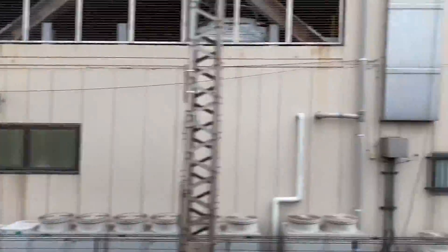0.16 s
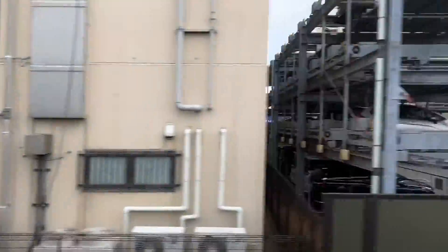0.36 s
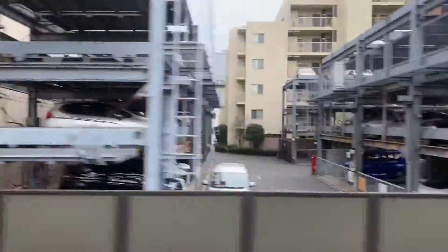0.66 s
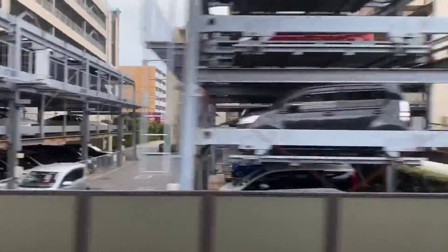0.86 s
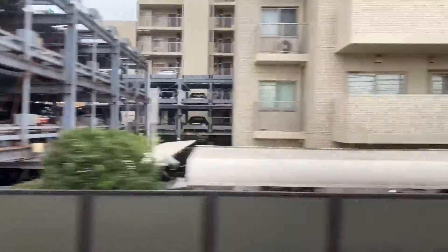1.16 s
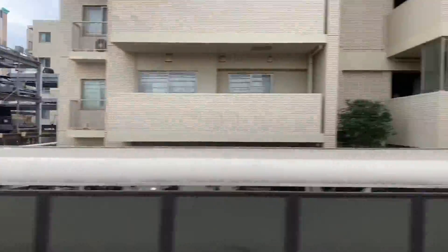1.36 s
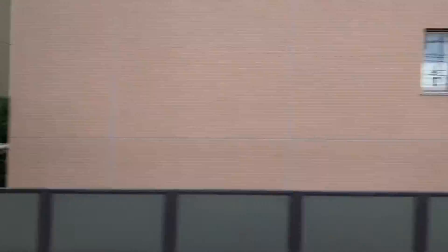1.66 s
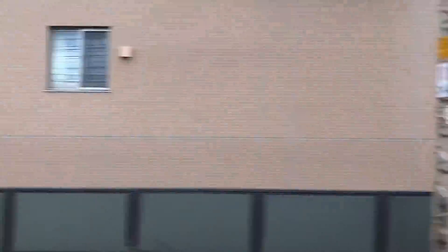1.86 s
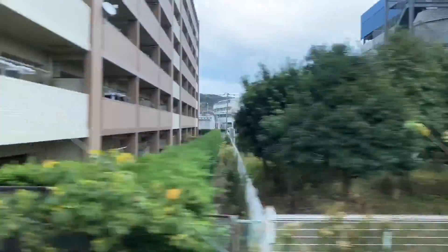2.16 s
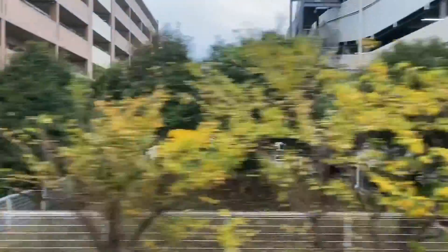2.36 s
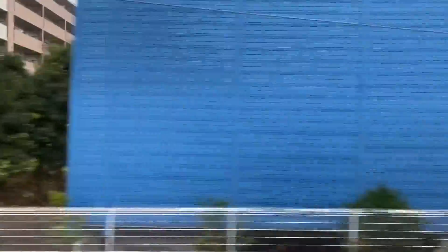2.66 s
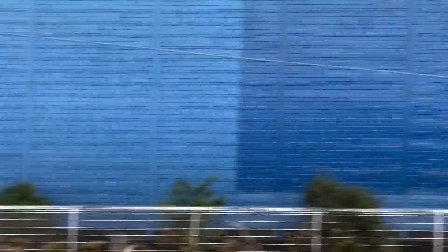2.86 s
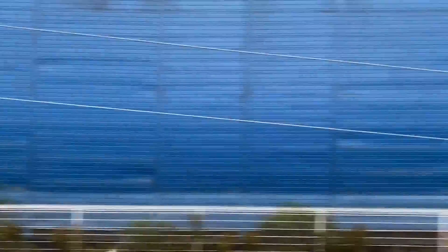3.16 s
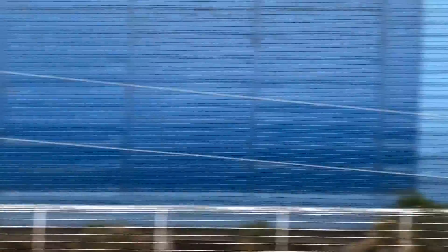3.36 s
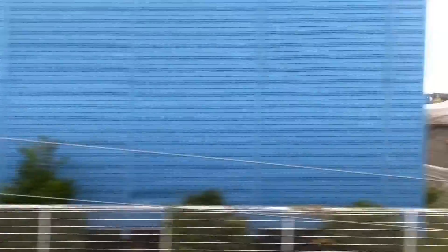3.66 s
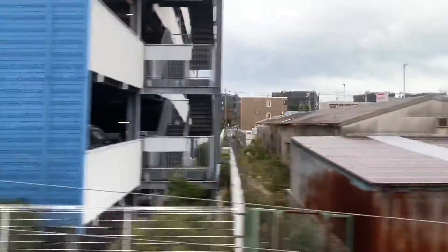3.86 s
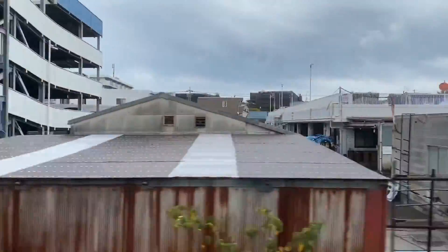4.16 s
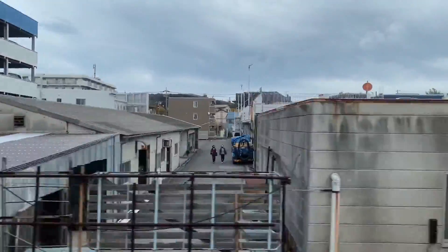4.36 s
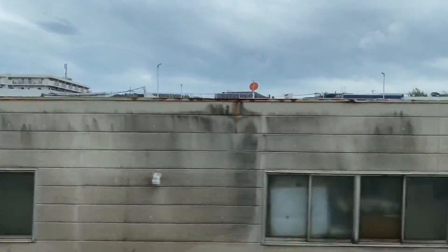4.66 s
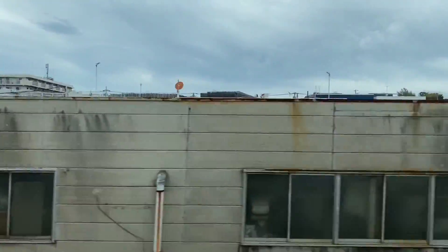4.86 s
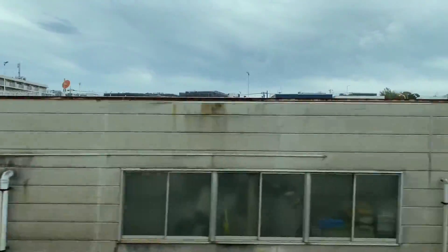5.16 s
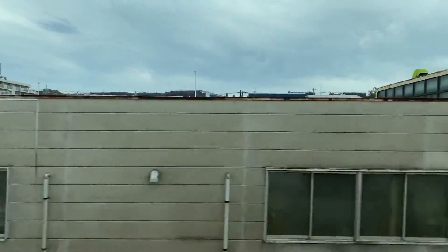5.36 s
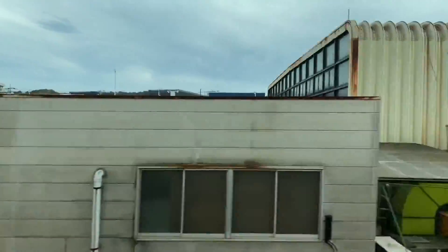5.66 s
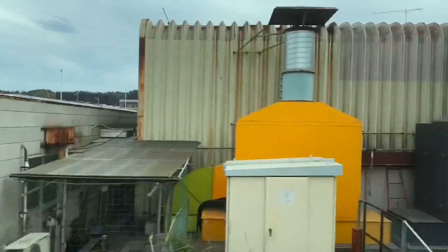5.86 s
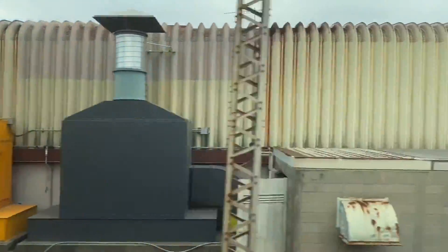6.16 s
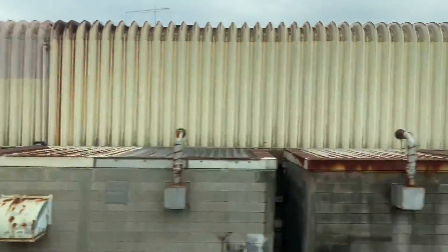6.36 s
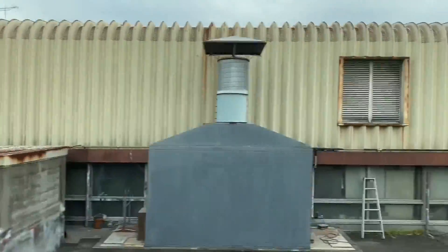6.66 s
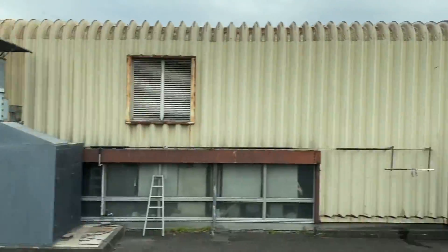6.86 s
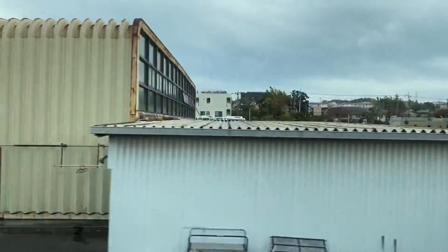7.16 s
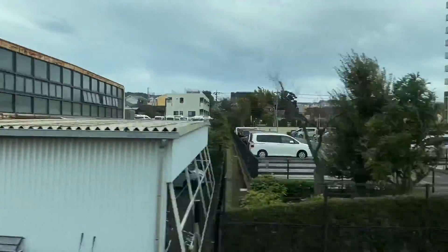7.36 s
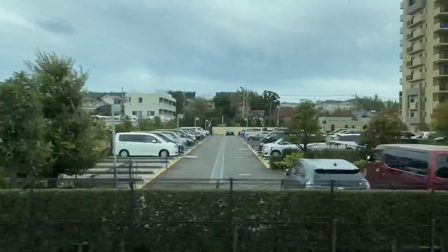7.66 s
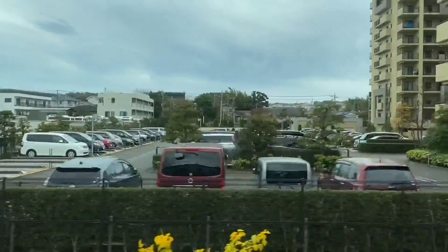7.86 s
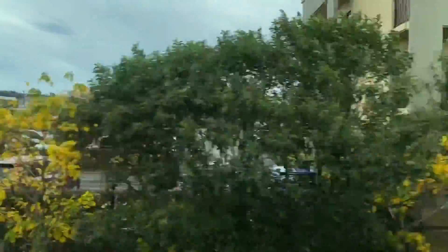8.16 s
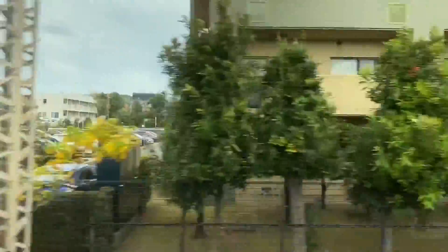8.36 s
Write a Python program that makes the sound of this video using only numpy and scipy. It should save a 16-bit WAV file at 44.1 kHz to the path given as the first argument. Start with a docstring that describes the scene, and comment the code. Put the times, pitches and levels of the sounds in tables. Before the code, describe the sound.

Stereo microphone in an enclosed train car beside the window. Dull rolling noise and a low electric hum run throughout, calmer at first, rougher from about three seconds, roughest near seven, then easing. Short thuds shake the floor and loose fittings knock and rattle. Rails sing faintly, flanges scuff, two tiny air hisses hide in the rumble, and a soft metallic wheel ring comes after a rattling cluster.

```python
"""Rolling wheels shake an electric commuter train's car body: band-filtered noise that follows track roughness.
The train coasts on welded rail, slowing slightly; motor tones and gear whine sink with it, rails sing faintly.
Bumps ring the floor modes, rail pits and flange scuffs are shaped noise, a wheel twice rings in a narrow band.
Loose fittings knock as clicks and decaying noise; air hisses twice, and one tiny tick is a filtered impulse."""
import sys
import numpy as np
from scipy import signal
from scipy.fft import rfft, irfft
from scipy.io import wavfile
from scipy.ndimage import uniform_filter1d, minimum_filter1d

SR = 44100
rng = np.random.default_rng(int(sys.argv[2]) if len(sys.argv) > 2 else 0)


def transcribe(u):
    """Save the signal u as a 16-bit wav file named by the first command-line argument.

    u: samples, shape (n,) or (channels, n), limited to [-1, 1]; the rate is SR.
    q: integer samples, one column per channel.
    """
    v = np.clip(np.atleast_2d(u).T, -1, 1)
    q = np.round(v * 32767).astype(np.int16)
    wavfile.write(sys.argv[1], SR, q)


N = 374850
T = np.arange(N) / SR
HZ = np.maximum(np.fft.rfftfreq(N, 1 / SR), 1)
LEFT_RIGHT = np.array([[1], [-1]])


def from_db(db):
    """Decibels to amplitude gain."""
    return 10 ** (np.asarray(db) / 20)


def in_time(rows):
    """Each column of a curve, interpolated at every sample."""
    s, *columns = np.transpose(rows)
    return [np.interp(T, s, c) for c in columns]


def over_hz(points):
    """Each column of a spectrum table, interpolated over log frequency."""
    hz, *columns = np.transpose(points)
    return np.squeeze([np.interp(np.log(HZ), np.log(hz), c) for c in columns])


def drift(rate_hz):
    """Slow random motion of spread 1: twice low-passed noise."""
    step = 100  # samples between drawn points
    warm_up = 1000
    r = np.exp(-2 * np.pi * rate_hz * step / SR)
    noise = rng.standard_normal(N // step + 2 + warm_up)
    slow = signal.lfilter([1], [1, -2 * r, r * r], noise)[warm_up:]
    return np.interp(np.arange(N) / step, np.arange(len(slow)), slow / slow.std())


def flutter(rate_hz, depth_db):
    """Random swelling and sinking of a level."""
    return from_db(depth_db * drift(rate_hz))


def pan(side_db):
    """Left and right gains for a level difference."""
    return from_db(0.5 * LEFT_RIGHT * side_db)


def band(low_hz, high_hz):
    """Gain of a steep band-pass."""
    return 1 / np.sqrt((1 + (low_hz / HZ) ** 10) * (1 + (HZ / high_hz) ** 10))


def coloured(field, gain):
    """Stereo noise of a given colour, rms 1 in the middle."""
    x = irfft(field * gain, N)
    return x / x.mean(0).std()


def dying(blows, decay_s):
    """Each blow lifts a level that then dies away exponentially."""
    return signal.lfilter([1], [1, -np.exp(-1 / (decay_s * SR))], blows)


def burst(s, rise_s, decay_s):
    """Envelope that rises linearly from time s and dies away exponentially."""
    age = np.maximum(T - s, 0)
    return np.minimum(age / rise_s, 1) * np.exp(-np.maximum(age - rise_s, 0) / decay_s)


def swells(rows):
    """Joint envelope of a table of brief swelling sounds."""
    return sum(from_db(db) * burst(s, rise_s, decay_s) for s, db, rise_s, decay_s in rows)


# cabin at the two ears: (frequency [Hz], likeness [0-1], left lead [rad], left-right [dB])
EAR_DIFFERENCES = [(30, .88, .55, 0), (85, .92, .7, .6), (440, .84, .75, 1.2), (650, .55, 1.0, 2.8),
                   (880, .25, .2, 7), (1080, .1, 1.3, 1), (1500, .25, 1.2, 0), (1950, .55, .3, 4),
                   (2800, .74, .6, 7.6), (4200, .37, .35, 2.5), (7000, .45, -.3, 0)]


def cabin_field():
    """Spectrum of white noise meeting two ears: alike in the bass, mostly more diffuse higher up."""
    alike, lead_rad, side_db = over_hz(EAR_DIFFERENCES)
    mid, side = rfft(rng.standard_normal((2, N)))
    gains = pan(side_db)
    ears = np.sqrt(1 + alike) * mid + np.sqrt(1 - alike) * side * LEFT_RIGHT
    field = ears * gains * np.exp(.5j * lead_rad * LEFT_RIGHT)
    return field / np.sqrt((gains ** 2).sum(0) + 2 * alike * np.cos(lead_rad))


def to_ears(x):
    """A single source reaches the ears with level and phase differences that vary with frequency."""
    _, lead_rad, side_db = over_hz(EAR_DIFFERENCES)
    return irfft(rfft(x) * pan(side_db) * np.exp(.5j * lead_rad * LEFT_RIGHT), N)


# roughness of the track under the car: (time [s], relative level [dB])
TRACK_ROUGHNESS = [(0, -4.5), (1.1, -6), (1.6, -2.5), (2.35, 0), (3.1, 2.5), (3.75, 3.5), (4.15, 1.5),
                   (5.4, 1.1), (5.95, 0.5), (6.45, 3), (7.05, 4), (8.0, -1), (8.5, 0.9)]


def on_track(db, share, db_per_s):
    """Gain that follows a share of the roughness swing, plus a steady trend as the train coasts."""
    rough_db, = in_time(TRACK_ROUGHNESS)
    return from_db(db + share * rough_db + db_per_s * T)


# rumble, floor drumming, panel boom, wheel roar: (low [Hz], high [Hz], level [dB],
# share of roughness swing [ratio], trend [dB/s], flutter rate [Hz], flutter depth [dB])
ROLLING_BANDS = [(10, 72, -28.5, 0.71, 0.15, 2, -1), (90, 152.5, -24.5, 1.4, -0.21, 6.7, 2.2),
                 (187, 438, -27, .6, 0.4847, 7.9, 1.5), (524, 1574, -31, 0.23, 0.2454, 17, 1.66)]
# rail singing: (time [s], level [dB])
RAIL_SINGING = [(0, -38.5), (0.5, -38.5), (1.28, -40.5), (1.7, -36.5), (3.0, -34.5), (4.2, -35),
                (5.9, -38.5), (7.0, -34), (7.4, -37), (8.5, -38)]
# rolling noise colour in the cabin: (frequency [Hz], spectral level [dB])
CABIN_COLOUR = [(18, -31.5), (30, -22.5), (52, 7), (105, 2), (210, -4.5), (370, -8), (490, -19.5),
                (1000, -25), (1400, -30.5), (2300, -29.5), (3400, -40), (5000, -52), (7600, -62),
                (9000, -77.5), (14000, -74)]
# panel and wheel resonances: (frequency [Hz], width [Hz], lift [dB])
RESONANCES = [(115, 17, 5), (179, 12, 7), (253.9, 20, 9), (324, 36, 5), (377, 9.1, 9), (436.8, 17, 7.5),
              (807.5, 40, 8), (924, 44, 7.5), (1068, 20, 3), (1217, 22, 6), (1862, 220, 5.5),
              (2604, 110, 4.5)]
RUSH_DB, RUSH_DB_PER_S = -55.5, 0.39


def rolling():
    """Rail roughness drives floor, body panels and wheels; rails sing; a smooth rush of air lies on top."""
    field = cabin_field()
    lift_db = sum(db / (1 + (2 * (HZ - hz) / width_hz) ** 2) for hz, width_hz, db in RESONANCES)
    colour = from_db(over_hz(CABIN_COLOUR) + lift_db)
    shaken = 0
    for low_hz, high_hz, db, share, db_per_s, rate_hz, depth_db in ROLLING_BANDS:
        level = on_track(db, share, db_per_s) * flutter(rate_hz, depth_db)
        shaken = shaken + level * coloured(field, colour * band(low_hz, high_hz))
    sing_db, = in_time(RAIL_SINGING)
    sing_level = from_db(sing_db) * flutter(rate_hz=20, depth_db=1.23)
    rails = sing_level * coloured(field, colour * band(1660, 3020))
    rush = from_db(RUSH_DB + RUSH_DB_PER_S * T) * coloured(field, colour * band(4050, 18000))
    return shaken + rails + rush


def partial(turns, unsteady, side_db, lead_rad, shake_hz):
    """One drive tone; the swaying body shakes its strength and phase."""
    wander = drift(shake_hz) + 1j * drift(shake_hz)
    sway = np.sqrt(2 * (1 - unsteady ** 2)) + unsteady * wander
    phase = 2 * np.pi * turns + np.angle(sway) + 0.5 * LEFT_RIGHT * lead_rad
    return pan(side_db) * np.abs(sway) * np.cos(phase)


# (time [s], motor fundamental [Hz], gear mesh [Hz])
DRIVE_PITCH = [(0, 88.1, 938), (3.3, 87.5, 928), (5.4, 87.15, 926), (8.5, 86.62, 908)]
# motor fundamental: (time [s], level [dB])
DRONE_LEVEL = [(0, -21), (1.1, -22), (1.5, -19), (2.2, -19), (2.8, -17), (3.35, -19), (3.6, -14.5),
               (4.3, -17), (5.1, -19), (5.55, -16.5), (5.9, -19.5), (6.6, -15), (7.4, -18), (8.0, -20),
               (8.5, -19.5)]
# drone position, left to slightly right: (time [s], left-right [dB])
DRONE_POSITION = [(0.0, 6), (4.64, -1), (6.96, -0.5), (8.5, -2.5)]
# fourth multiple: (time [s], level [dB])
HUM_LEVEL = [(0, -26), (1.1, -27.5), (1.55, -25), (2.2, -29.5), (2.75, -23), (3.3, -27.5), (4.3, -24.5),
             (5.6, -26), (6.3, -23), (6.75, -28.5), (7.3, -24), (8.0, -23), (8.5, -22.5)]
# eighth multiple: (time [s], level [dB])
WHINE_LEVEL = [(0, -40), (2.55, -41), (3.05, -29.5), (3.7, -31.5), (4.2, -39.5), (5.0, -38), (5.7, -32.5),
               (6.5, -28.5), (7.55, -31), (8.5, -26)]
# weaker motor tones: (multiple [ratio], level [dB], unsteadiness [0-1], left-right [dB])
WEAK_PARTIALS = [(2, -51.5, 0, -1), (10, -44, 0.9, 14.5), (12, -50, 0, 9.5)]
# octave of the gear mesh: (time [s], level [dB])
MESH_OCTAVE_LEVEL = [(0, -43.5), (2, -40), (4.5, -39.5), (8.5, -42)]
MESH_DB, MESH_WAVER_HZ = -44.5, 16
LOAD_SHARE = 0.3  # share of the roughness swing in weak tones and mesh


def drive():
    """Motor tones follow the speed; weaker tones and gear mesh also grow with track roughness."""
    turns, teeth = np.cumsum(in_time(DRIVE_PITCH), axis=1) / SR
    drone_db, = in_time(DRONE_LEVEL)
    drone_side_db, = in_time(DRONE_POSITION)
    hum_db, = in_time(HUM_LEVEL)
    whine_db, = in_time(WHINE_LEVEL)
    mesh_octave_db, = in_time(MESH_OCTAVE_LEVEL)
    drone = from_db(drone_db) * partial(turns, 0.59, drone_side_db, lead_rad=0.94, shake_hz=7)
    hum = from_db(hum_db) * partial(4 * turns, 0.3, side_db=7.5, lead_rad=0.88, shake_hz=11)
    whine = from_db(whine_db) * partial(8 * turns, 0.46, side_db=2, lead_rad=1.4, shake_hz=13)
    weak = sum(from_db(db) * partial(k * turns, unsteady, side_db, lead_rad=0.99, shake_hz=23)
               for k, db, unsteady, side_db in WEAK_PARTIALS)
    mesh = from_db(MESH_DB) * partial(teeth, 0.85, side_db=7.5, lead_rad=0.1, shake_hz=15)
    waver = np.cumsum(MESH_WAVER_HZ * drift(rate_hz=6)) / SR
    octave_level = from_db(mesh_octave_db) * flutter(rate_hz=4, depth_db=2.2)
    octave_tone = partial(2 * teeth + waver, 0.91, side_db=4, lead_rad=0.25, shake_hz=22.1)
    load = on_track(db=0, share=LOAD_SHARE, db_per_s=0)
    return drone + hum + whine + load * (weak + mesh + octave_level * octave_tone)


# bumps in the track: (time [s], strength [dB])
TRACK_BUMPS = [(.012, -10), (1.39, -9), (2.027, -15), (3.157, -2), (3.52, -8), (3.561, -7), (3.703, -2),
               (3.859, -8), (4.05, -4), (4.419, -7), (4.911, -7), (5.51, 0), (5.55, -6), (6.295, -5),
               (6.448, 2.5), (6.578, -8), (7.049, -8), (7.349, -4.5), (7.447, -2)]
# floor modes: (frequency [Hz], relative level [dB], t60 [s])
FLOOR_MODES = [(60.4, -10, 0.086), (82, -4.5, .18), (113.5, 2, 0.14), (168.7, 1.5, 0.091)]
BUMP_TRIM_DB, BUMP_SPREAD_DB = -3.0, 1.5


def bumps():
    """Each bump pushes the floor, whose low modes ring briefly as two-pole resonators."""
    out = np.zeros(N)
    at = [round(s * SR) for s, _ in TRACK_BUMPS]
    spread_db = rng.normal(0, BUMP_SPREAD_DB, (len(TRACK_BUMPS), len(FLOOR_MODES)))
    strengths_db = np.array(TRACK_BUMPS)[:, 1:] + spread_db
    for k, (hz, db, t60_s) in enumerate(FLOOR_MODES):
        pushes = np.full(N, 1e-18)
        pushes[at] = from_db(strengths_db[:, k] + db + BUMP_TRIM_DB) * (-1) ** k  # alternating sign
        r, w = from_db(-60 / (t60_s * SR)), 2 * np.pi * hz / SR
        out += signal.lfilter([0, np.sin(w)], [1, -2 * r * np.cos(w), r * r], pushes)
    return to_ears(out)


# flanges scuff the rail: (time [s], level [dB], rise [s], decay [s])
FLANGE_SCUFFS = [(.33, -36, 0.03, 0.1), (3.21, -35, .02, 0.03), (5.515, -31.5, .01, .05),
                 (6.9, -32.5, 0.06, .07)]
# rubbing colour: (frequency [Hz], spectral level [dB])
SCUFF_COLOUR = [(500, -9), (900, 3), (1400, -0.5), (1900, 4), (2700, -3.5), (3600, -11.5)]
# a wheel rings: (time [s], level [dB], rise [s], decay [s])
WHEEL_RINGS = [(6.62, -27, 0.071, 0.31), (7.96, -30, 0.045, 0.078)]
RING_HZ, RING_WIDTH_HZ = 875, 22
GRITS_PER_S, GRIT_DB, GRIT_SPREAD_DB, GRIT_DECAY_S = 41, -44.5, 2.5, 0.013  # rate at 0 dB roughness


def wheel_contact():
    """Rail pits make coarse grain and flanges scuff, both dulled by the floor; a wheel rings briefly."""
    field = cabin_field()
    hit = rng.random(N) < GRITS_PER_S * on_track(db=0, share=.6, db_per_s=0) / SR
    sizes = from_db(GRIT_DB + GRIT_SPREAD_DB * np.minimum(rng.exponential(1, N), 3))
    grain = dying(hit * sizes, GRIT_DECAY_S)
    scuffing = swells(FLANGE_SCUFFS) * flutter(rate_hz=60, depth_db=4.5)
    rubbing = (grain + scuffing) * coloured(field, from_db(over_hz(SCUFF_COLOUR)))
    through_floor = signal.butter(6, 3300, fs=SR, output="sos")
    scrape = signal.sosfilt(through_floor, rubbing)
    wheel_mode = 1 / (1 + (2 * (HZ - RING_HZ) / RING_WIDTH_HZ) ** 2)
    return pan(2.0) * scrape + swells(WHEEL_RINGS) * coloured(field, wheel_mode)


# loose fittings: (time [s], onset level [dB], relative thud [dB], relative click [dB], rattle time [s])
FITTING_KNOCKS = [(.158, -22, -12, 20, 0), (2.078, -16, -2, 14, 0), (2.953, -21.5, -6, 17, 0),
                  (3.043, -21.5, 1, 12, 0), (3.245, -24, 13, 6, .008), (3.382, -24, 5, 19, .008),
                  (3.619, -11, 2, 11, .008), (5.201, -22, 5, 20, 0), (5.472, -23.5, 7, 18, .006),
                  (5.525, -17, 4, 16, .006), (5.537, -22.5, 11, 9, 0), (5.553, -23.5, 10, 8, 0),
                  (5.566, -22, 8, 13, 0), (6.223, -20, -8, 26, .006), (6.346, -19.5, -1, 23.5, .006),
                  (6.427, -20, 3, 15, .006), (6.463, -21, 1, 10, .028), (7.07, -17, 2, 14, .016),
                  (7.898, -17.5, -14, 21, 0)]
REBOUND_S, REBOUND_LOSS_DB = 0.0055, 3.5  # nominal gap; loss per rebound


def contacts():
    """Every strike, weakening rebounds included: rows of (s, dB, thud dB, click dB)."""
    rows = []
    for s, db, thud_db, click_db, rattle_s in FITTING_KNOCKS:
        gaps_s = REBOUND_S * rng.uniform(.6, 1.2, size=12)
        ages_s = np.cumsum(gaps_s) - gaps_s[0]
        count = 1 + int(round(rattle_s / REBOUND_S))
        for k, age_s in enumerate(ages_s[:count]):
            rows.append((s + age_s, db - REBOUND_LOSS_DB * k, thud_db, click_db))
    return rows


def evened(x):
    """Dense ringing held at a nearly steady strength of 1."""
    return x / np.sqrt(uniform_filter1d(x.mean(0) ** 2, size=220) + 1e-9)


# ringing colour of a knock: (frequency [Hz], spectral level [dB])
KNOCK_COLOUR = [(250, -13), (450, 2.5), (800, 8), (1150, -2), (1600, 1.5), (2300, -9), (3300, -17),
                (4500, -38.5), (9000, -70)]
# thud colour: (frequency [Hz], spectral level [dB])
THUD_COLOUR = [(90, -5), (180, -7), (270, 5), (400, -3.5), (600, -15.5), (1500, -59.5)]


def knocks(decay_s=0.0045, thud_decay_s=0.012, tail_db=-24, tail_decay_s=0.048):
    """Fittings strike their frames: contact click, dense damped modes, duller thud, short cabin tail."""
    field = cabin_field()
    s, db, thud_db, click_db = np.transpose(contacts())
    blows, weight, edge = np.full((3, N), 1e-18)
    at = np.round(s * SR).astype(int)
    blows[at], weight[at], edge[at] = from_db([db, db + thud_db, db + click_db])
    click = signal.sosfilt(signal.butter(2, [700, 2400], "band", fs=SR, output="sos"), edge)
    crack_level = dying(blows, decay_s) + from_db(tail_db) * dying(blows, tail_decay_s)
    crack = crack_level * evened(coloured(field, from_db(over_hz(KNOCK_COLOUR))))
    thud = dying(weight, thud_decay_s) * coloured(field, from_db(over_hz(THUD_COLOUR)))
    lining = signal.butter(6, 3300, fs=SR, output="sos")  # the cabin lining dulls every knock
    return pan(4.4) * signal.sosfilt(lining, to_ears(click) + crack + thud)


# short hisses: (time [s], level [dB], rise [s], decay [s])
HISSES = [(4.498, -46.5, 0.036, 0.053), (5.512, -49, 0.019, 0.05)]
# hiss colour: (frequency [Hz], spectral level [dB])
AIR_COLOUR = [(2000, -24), (4000, 10), (5200, 6), (7800, 0.5), (10000, -13), (15000, -20.5)]


def air_puffs():
    """A little air escapes and sputters, perhaps at a suspension valve: fluttering coloured noise."""
    level = swells(HISSES) * flutter(rate_hz=100, depth_db=2.5)
    return level * coloured(cabin_field(), from_db(over_hz(AIR_COLOUR)))


TICK_S, TICK_IMPULSE_DB = 6.455, -23  # level before the band-pass


def tick():
    """One tiny bright tick just after a strong bump: a band-passed impulse."""
    snap = np.full(N, 1e-18)
    snap[round(TICK_S * SR)] = from_db(TICK_IMPULSE_DB)
    return signal.sosfilt(signal.butter(2, [5800, 8200], "band", fs=SR, output="sos"), snap)


def scene():
    """Everything heard from beside the window."""
    return rolling() + drive() + bumps() + wheel_contact() + knocks() + air_puffs() + tick()


CUTOFF_HZ = 15100


def record(dry):
    """A smooth look-ahead limiter holds down peaks; the ends are eased and the top is cut."""
    allowed = np.minimum(1, .93 / np.maximum(np.abs(dry).max(0), 1e-6))
    gain = minimum_filter1d(allowed, size=241)
    gain = uniform_filter1d(uniform_filter1d(gain, size=121), size=121)
    ease = np.minimum(1, np.minimum(T, T[-1] - T) / .002)
    low_pass = signal.cheby2(12, 70, CUTOFF_HZ, fs=SR, output="sos")
    return signal.sosfilt(low_pass, dry * gain * ease)


dry = scene()
out = record(dry)
transcribe(out)
```